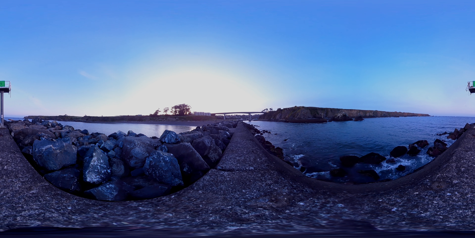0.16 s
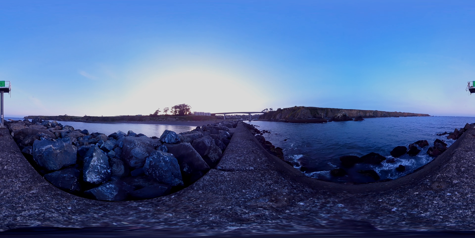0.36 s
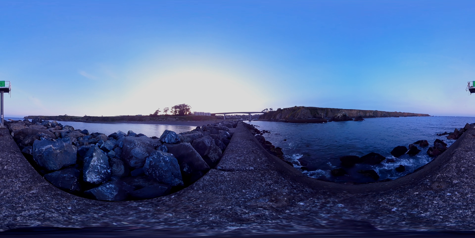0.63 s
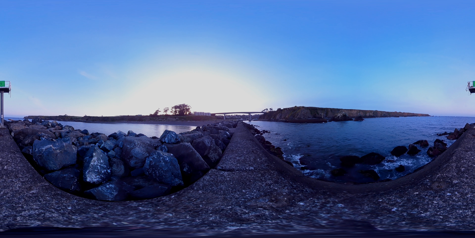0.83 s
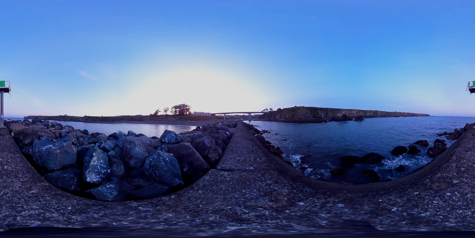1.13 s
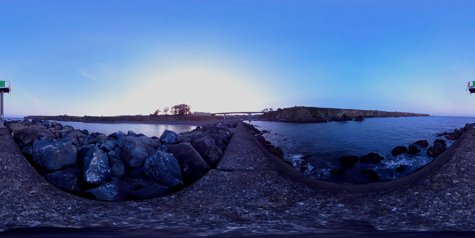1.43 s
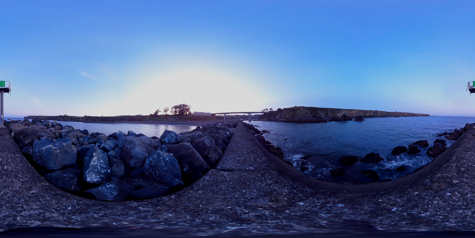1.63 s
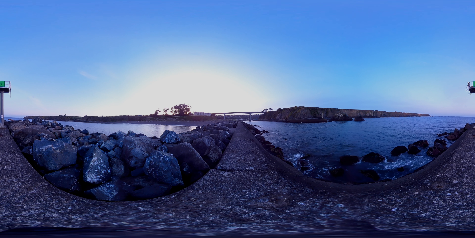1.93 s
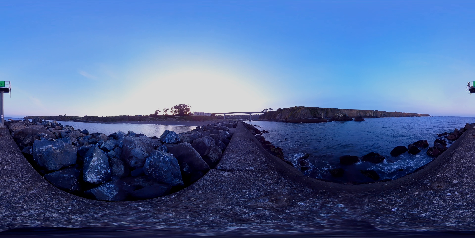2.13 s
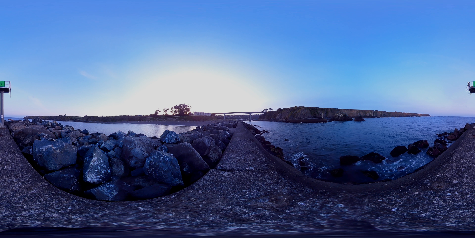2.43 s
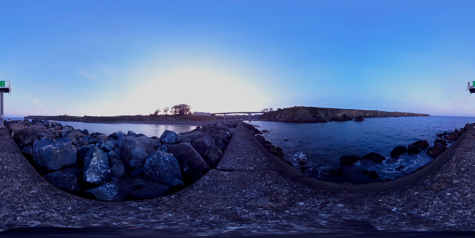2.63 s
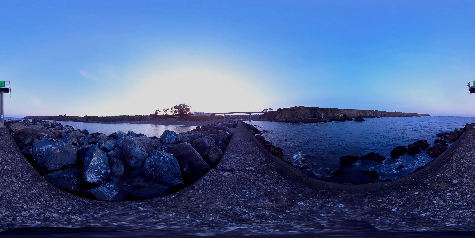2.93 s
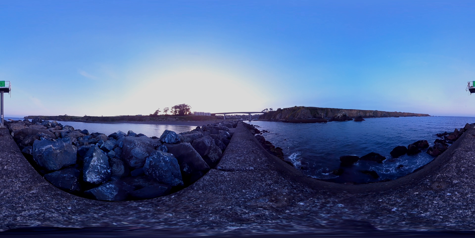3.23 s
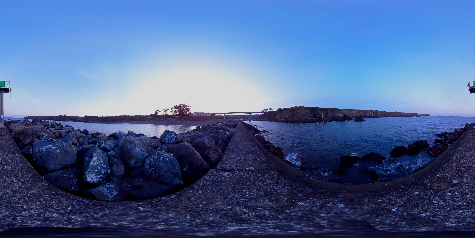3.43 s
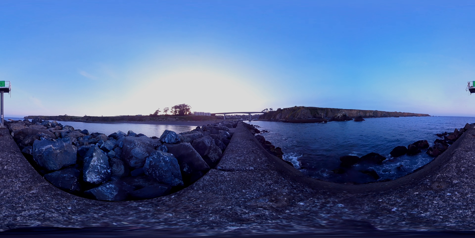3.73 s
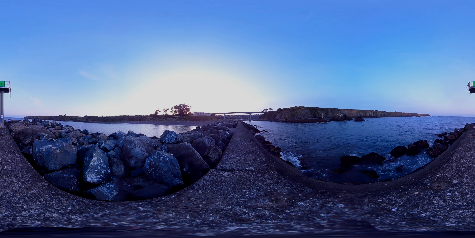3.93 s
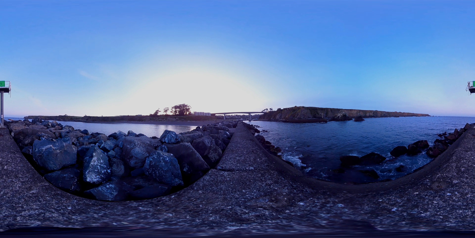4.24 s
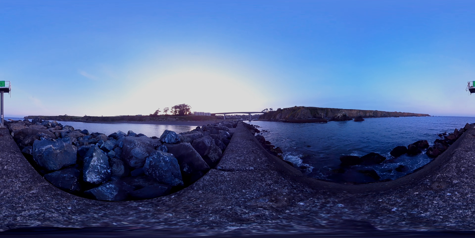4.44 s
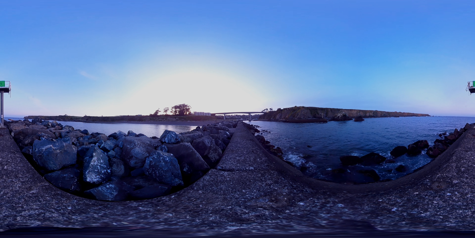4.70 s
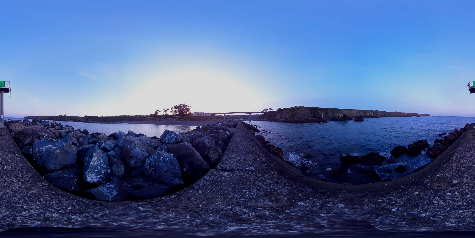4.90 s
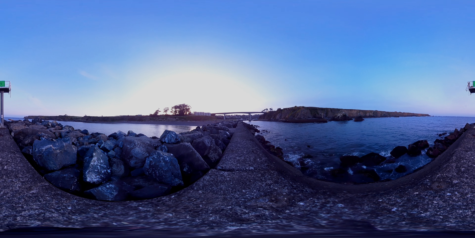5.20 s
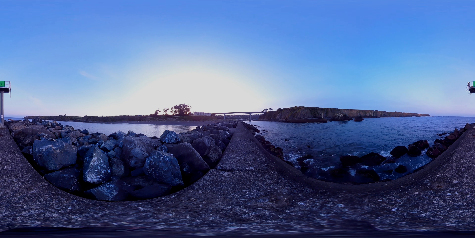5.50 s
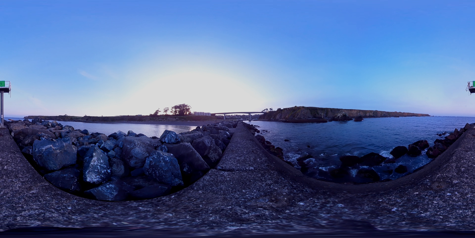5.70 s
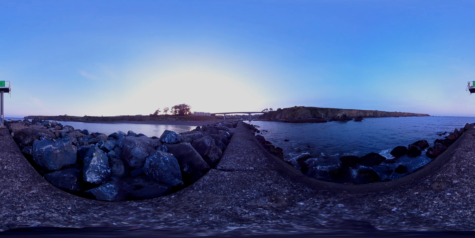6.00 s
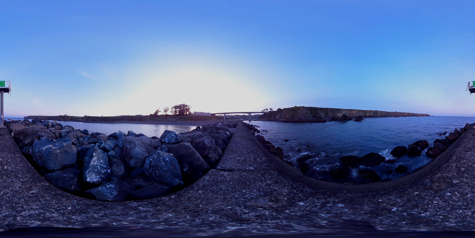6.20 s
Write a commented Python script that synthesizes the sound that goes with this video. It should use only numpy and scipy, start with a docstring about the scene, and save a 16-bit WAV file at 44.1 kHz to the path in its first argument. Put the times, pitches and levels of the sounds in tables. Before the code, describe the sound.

Heard from an open stone jetty: a broad, soft roar of sea, with hissing foam and little rising bubble notes as water fills gaps in the rocks. It opens with a wash, lulls while a distant horn barely shows, then breaks repeatedly. Low wind thuds hit the left and right of a small, slightly muffled stereo microphone separately, strongest in the last second.

```python
"""Small waves on a harbour jetty

Small waves wash over boulders: swelling bands of noise make a broad roar, with foam popping on top.
Short rings that rise in pitch are pockets of air glugging between the rocks.
Low noise and single push-pull pulses are wind on each port of a small two-port microphone.
A far horn, one sine wave, holds a low note for most of a second."""
import sys
import numpy as np
from scipy import signal
from scipy.fft import rfft, irfft, next_fast_len
from scipy.io import wavfile

SR = 44100
rng = np.random.default_rng(int(sys.argv[2]) if len(sys.argv) > 2 else 0)


def log_audio(samples):
    """Write samples as a 16-bit WAV file to the path given in sys.argv[1]."""
    # one column per channel
    frames = np.atleast_2d(samples).T
    # limit to full scale, then quantise
    limited = np.clip(frames, -1, 1)
    pcm = np.round(limited * 32767).astype(np.int16)
    wavfile.write(sys.argv[1], SR, pcm)


def rack_gain(trim_db):
    """Turn a fader trim in dB into the linear factor to multiply a signal by."""
    fader = np.asarray(trim_db, float)
    return 10 ** (fader / 20)


N = 280337   # samples, about 6.4 s


def rms_one(x):
    """Scale to unit rms."""
    return x / np.sqrt(np.mean(x ** 2) + 1e-20)


def at_hz(rows, hz):
    """Join the rows of a spectrum by straight lines on a log-frequency axis."""
    at, *columns = np.transpose(rows)
    return [np.interp(np.log(hz), np.log(at), column) for column in columns]


def drift(rate_hz):
    """Slow chance of spread 1: noise at every 40th sample, smoothed twice by a one-pole low-pass."""
    pole = np.exp(-2 * np.pi * rate_hz * 40 / SR)
    noise = rng.standard_normal(N // 40 + 2002)
    slow = signal.lfilter([1], [1, -2 * pole, pole ** 2], noise)[2000:]   # drop the filter's start-up
    return np.interp(np.arange(N) / 40, np.arange(len(slow)), rms_one(slow))


def cut(x, hz, kind, order):
    """Butterworth low- or high-pass."""
    return signal.sosfilt(signal.butter(order, hz, kind, fs=SR, output="sos"), x)


def seconds_outside(start_s, length_s):
    """How far each sample lies before or after a span of time; zero inside it."""
    t = np.arange(N) / SR
    return np.maximum(start_s - t, 0) + np.maximum(t - start_s - length_s, 0)


def horn():
    """A far steady note that swells a little; the air between makes it waver."""
    # one horn note: start_s, length_s, pitch_hz, level_db (rms at its middle, before the waver)
    horn_note = (1.4, 0.7, 157, -49)
    start_s, length_s, pitch_hz, level_db = horn_note
    swell_db_per_s, edge_db_per_s, waver_db = 4, 60, 1.3
    t = np.arange(N) / SR
    swell_db = swell_db_per_s * (t - start_s - length_s / 2)
    edge_db = -edge_db_per_s * seconds_outside(start_s, length_s)
    loudness = rack_gain(level_db + swell_db + edge_db + waver_db * drift(4))
    return np.sqrt(2) * loudness * np.sin(2 * np.pi * pitch_hz * t)


def gusts_db():
    """Each gust rises fast, holds and falls back to the calm, at its own strength on each port."""
    # gusts on the ports: middle_s, left_db, right_db (rms of the rumble), held_s
    gust_list = [(0.08, -46, -43.5, 0.027), (0.19, -55, -48, 0.048), (0.62, -61, -63, .2),
                 (0.89, -43, -37, 0.048), (1.2, -47, -39, 0.012), (1.359, -45, -40, 0.013),
                 (1.68, -62.5, -51.5, 0.021), (1.92, -61, -48, 0.05), (2.18, -65, -45.5, 0.066),
                 (2.45, -45, -42, .04), (2.57, -41, -55, 0.03), (2.72, -50, -43, .16),
                 (3.02, -40, -38.5, 0.074), (3.12, -45, -57, 0.027), (3.33, -43, -36.5, 0.033),
                 (3.435, -39.5, -35.5, 0.04), (3.5, -36.5, -42, 0.094), (3.6, -54, -40, 0.018),
                 (3.78, -41.5, -46, 0.051), (4.001, -47.5, -41, 0.077), (4.12, -47, -41.5, .06),
                 (4.28, -39, -37, 0.1), (4.521, -39, -40, 0.17), (4.68, -48, -42.5, 0.087),
                 (4.93, -47, -44, .08), (5.07, -41, -38, 0.13), (5.22, -43, -43, .1),
                 (5.47, -33.5, -33.5, 0.096), (5.7, -33.5, -33, 0.2), (5.95, -34, -33.5, 0.26),
                 (6.27, -32.5, -31.5, 0.29)]
    calm_db, rise_db_per_s, fall_db_per_s = -66, 164, 170
    middle_s, left_db, right_db, held_s = np.transpose(gust_list)[:, :, None]
    t = np.arange(0, N + 64, 64) / SR   # every 64 samples is fine enough
    rise_db = -rise_db_per_s * np.maximum(middle_s - held_s / 2 - t, 0)
    fall_db = -fall_db_per_s * np.maximum(t - middle_s - held_s / 2, 0)
    ports = []
    for db in (left_db, right_db):
        power = rack_gain(calm_db) ** 2 + np.sum(rack_gain(db + rise_db + fall_db) ** 2, axis=0)
        ports.append(np.interp(np.arange(N) / SR, t, 10 * np.log10(power)))
    return np.array(ports)


def wind():
    """Eddies push on each port alone; stronger gusts carry faster eddies and reach higher."""
    gust_db = gusts_db()
    noise = rng.standard_normal((3, 2, N))
    # three bands of eddies, slow to fast
    rumble = rms_one(cut(cut(noise[0], 114, "low", order=3), 31, "high", order=2))
    flutter = rms_one(cut(cut(noise[1], 195, "low", order=5), 103, "high", order=2))
    whip = rms_one(cut(cut(noise[2], 305, "low", order=3), 226, "high", order=2))
    # levels against the rumble; both grow with the gust
    flutter_db = -5 + 0.93 * (gust_db + 31)
    whip_db = -13 + 2.2 * (gust_db + 32)
    lumps = rack_gain(2.8 * np.array([drift(24), drift(9.4)]))   # uneven strength, left and right
    lumps /= np.sqrt(np.mean(lumps ** 2))
    return rack_gain(gust_db) * lumps * (rumble + rack_gain(flutter_db) * flutter + rack_gain(whip_db) * whip)


def buffets():
    """One large eddy rolls over a port: a push and a pull of about one cycle."""
    # single strong buffets: middle_s, peak_db, pitch_hz, port (0 left, 1 right)
    buffet_list = [(0.804, -33, 89, 0), (.865, -41, 71, 0), (0.887, -21, 91.7, 1), (.905, -34, 60, 0),
                   (2.8, -31, 92.5, 0), (2.822, -31, 53, 1), (2.944, -28.5, 80, 0), (3.136, -31, 64, 0),
                   (3.437, -27, 110, 1), (3.589, -28, 69, 1), (4.138, -32, 87, 1), (4.246, -28, 131, 0),
                   (4.389, -31, 70, 0), (4.447, -29.5, 65, 1), (4.933, -26, 113, 0), (5.044, -26.5, 98, 1),
                   (5.248, -28, 76, 1), (5.484, -17.5, 59, 1), (5.596, -23, 91, 1), (5.874, -21, 135, 0),
                   (5.896, -21.5, 104, 1), (6.215, -21, 112, 0), (6.249, -25, 76, 1), (6.331, -22, 64.5, 0),
                   (6.347, -32.5, 135, 1)]
    width_cycles = 0.68   # from the middle until the pulse has shrunk to about a third
    out = np.zeros((2, N))
    for middle_s, peak_db, pitch_hz, port in buffet_list:
        turns = (np.arange(N) / SR - middle_s) * pitch_hz
        near = np.abs(turns) < 2
        turns = turns[near]
        shape = np.exp(-(turns / width_cycles) ** 2)
        out[int(port > 0.5), near] += rack_gain(peak_db) * shape * np.cos(2 * np.pi * turns + 0.29)
    return out


def glugs():
    """A closing pocket rings a few cycles and rises in pitch as it shrinks; many small ones come at random."""
    # air pockets closing between the rocks: start_s, peak_db, pitch_hz (at the start), ring_cycles
    pocket_list = [(0.042, -32, 1740, 7.9), (0.229, -31, 1000, 6), (0.24, -39, 1440, 7),
                   (0.293, -34, 745, 6.9), (0.394, -38, 540, 5), (0.411, -37, 1750, 7),
                   (1.835, -35, 1180, 6), (2.223, -38, 1610, 8), (2.64, -35, 1180, 6),
                   (2.849, -38, 2120, 8), (3.182, -36, 1430, 8), (3.249, -35, 2140, 8.3),
                   (3.897, -34, 1940, 8.7), (4.037, -36, 397, 5), (4.186, -32, 585, 5.5),
                   (4.495, -39, 2850, 9), (4.611, -36.5, 1580, 6.5), (4.662, -30, 720, 7),
                   (4.899, -35, 1530, 12), (4.907, -36, 930, 8), (4.9455, -33.5, 2530, 12),
                   (4.969, -39, 1300, 8), (5.102, -43, 3300, 13), (5.201, -51, 3320, 10),
                   (5.505, -36.5, 2600, 9), (5.54, -40, 1590, 7.6), (5.711, -33, 490, 5.6),
                   (6.294, -32, 1061, 7.4), (2.015, -30, 390, 3.3), (2.188, -34.5, 226, 13),
                   (2.21, -37, 245, 70), (2.239, -34.5, 340, 5.7), (2.385, -28.5, 273, 2.9),
                   (2.662, -35.5, 250, 7.6), (3.256, -30.5, 193, 5.4), (3.3782, -22.5, 410, 1.9),
                   (3.397, -33, 1070, 5), (3.422, -29, 726, 3.6), (3.509, -27.5, 380, 2),
                   (3.525, -35, 710, 5.6), (3.588, -32, 480, 2.3), (3.727, -34, 473, 5.3),
                   (3.826, -38, 493, 5.4), (4.845, -32, 305, 1.3), (5.09, -32, 350, 6.4),
                   (5.375, -30, 376, 3.7)]
    rise, small_per_s, small_cycles = 0.14, 25, 2.9
    draws = rng.random((int(small_per_s * N / SR), 3))
    small_start_s = draws[:, 0] * N / SR
    small_peak_db = -46 - 4 * np.log(draws[:, 1] + 0.05)   # most are quiet, a few louder
    small_pitch_hz = 220 * 4 ** draws[:, 2]
    small = np.c_[small_start_s, small_peak_db, small_pitch_hz, np.full(len(draws), small_cycles)]
    out = np.zeros(N + SR)   # a spare second for the last tails
    for start_s, peak_db, pitch_hz, cycles in np.vstack([pocket_list, small]):
        turns = np.arange(int(3 * cycles / pitch_hz * SR)) * pitch_hz / SR
        shape = (1 - np.exp(-3 * turns)) ** 2 * np.exp(-3 * turns / cycles)
        ring = np.sin(2 * np.pi * (turns + rise * turns ** 2 / cycles))
        at = int(start_s * SR)
        out[at:at + len(turns)] -= rack_gain(peak_db) * shape / shape.max() * ring
    return out[:N]


def foam_pops(per_s, spread_db):
    """Tiny bubbles burst at random, most small and a few large, in clumps."""
    sizes = rack_gain(spread_db * np.minimum(rng.exponential(1, N), 5)) * rng.choice([-1, 1], N)
    born = rng.random(N) < per_s * rack_gain(3 * drift(15)) / SR   # the drift makes the clumps
    return rms_one(cut(sizes * born, 4300, "high", order=2))


def treble_turn():
    """Radians of phase turn between the ports in the top treble, before sway and a weight by pitch."""
    # spans in which the phase of the top treble turns: start_s, length_s, turn_rad (added to the rest)
    turn_list = [(0.0, 0.041, 1.4), (0.155, 0.075, 1.6), (0.364, 0.16, 0.91), (0.639, 0.036, 1.3),
                 (0.73, 0.19, 1.4), (1.145, 0.38, 0.78), (1.888, 0.25, 0.72), (2.834, 0.019, 0.97),
                 (2.975, 0.32, 1.4), (3.39, 0.034, 1.4), (3.662, 0.19, 2.04), (4.03, 0.32, 1.6),
                 (4.422, 0.25, 1.7), (5.36, 0.07, 0.35), (5.78, 0.13, 0.29), (6.17, 0.027, 0.17)]
    edge_s, rest_rad = 0.021, 0.11   # how fast the turn comes and goes; the turn between spans
    return rest_rad + sum(turn_rad * np.exp(-(seconds_outside(start_s, length_s) / edge_s) ** 2)
                          for start_s, length_s, turn_rad in turn_list)


def sea_level_db(hz):
    """The far sea, and the dB that breakers add: each builds, crests and dies, loudest around its own middle."""
    # pitches at which the far sea's level is given: pitch_hz
    sea_pitches = [420, 1000, 2300, 6500]
    # the unbroken far sea at those pitches (swell roar, breaking, wash, foam): level_db
    far_levels = [-45.5, -45, -50.5, -52]
    # water breaking on the rocks: crest_s, level_db (against the far sea),
    # middle (octaves above 250 Hz), spread (octaves), dying_s
    breaker_list = [(0.0, 5.5, 0.7, 2.2, 0.056), (0, 6, 4.5, 0.61, 0.45), (0.34, 4, 1.8, 1.36, 0.28),
                    (0.03, 6, 2.8, 0.6, 0.4), (0.45, -2, 0, 0.62, 0.36), (0.85, -12, 6.3, 1.6, 0.2),
                    (0.02, 7.5, 5.5, 0.69, 0.43), (1.95, -2, 1.4, 1.4, 0.23), (2.5, 0.5, 1, 0.96, 0.21),
                    (2.3, -0.5, 4.5, 1.0, .5), (2.7, -3, 1.4, 1.5, 0.087), (2.82, 2, 4.6, 0.83, 0.37),
                    (3.1, 5, 5, 1.85, 0.59), (3, 1.5, 0.9, 0.8, 0.06), (3.5, 4.5, 0.9, 1.1, 0.22),
                    (3.5, 2.5, 0.7, 0.7, 0.07), (3.42, 5.5, 5.1, 2, 0.46), (3.5, 8, 6.4, 1.7, 0.18),
                    (4, -1.5, 0.83, 1.2, 0.38), (4.2, 4, 6, 2.6, 0.54), (4.5, 6.5, 6.5, 2.2, 0.41),
                    (4.7, -3, 0, 1.3, 0.091), (4, -2, 3, 0.41, .3), (5, 1, 0, 0.44, 0.18),
                    (5, -4, 2.2, 1.1, 0.2), (4.92, 5, 3.5, 0.75, 0.38), (5.0, 2, 5, 0.84, 0.61),
                    (4.5, 1, 5, 1.1, 0.47), (5.15, 2, 3, 1.6, 0.18), (5, 5.5, 0.4, 0.49, 0.19),
                    (5.5, 6, 3.44, 0.39, 0.46), (5.45, 6.5, 5, 0.8, 0.7), (5.5, -2.5, 0.77, 1.4, 0.65),
                    (5.7, 0.5, 4, 1.3, 0.18), (6, 0.5, 5, 1.5, 0.32), (6.15, 4.5, 4.5, 0.69, 0.43),
                    (6.25, 0, 0.5, 0.59, 0.26)]
    build_s = 0.094   # a breaker grows for about this long before its crest
    crest_s, db, middle, spread, dying_s = np.transpose(breaker_list)[:, :, None]
    t = np.arange(0, N + 64, 64) / SR
    building = ((crest_s - t) / build_s) ** 2
    dying = (t - crest_s) / np.maximum(dying_s, 0.03)
    shape = np.exp(-np.where(t < crest_s, building, dying))
    reach = np.exp(-((np.log2(hz / 250) - middle) / np.maximum(spread, 0.3)) ** 2)
    over_db = 10 * np.log10(1 + np.sum(rack_gain(db) ** 2 * reach * shape, axis=0))
    far_db = np.interp(np.log(hz), np.log(sea_pitches), far_levels)
    return far_db, np.interp(np.arange(N) / SR, t, over_db)


def sea():
    """Overlapping bands of noise, each swelling with its part of the wave and flickering on its own."""
    # the sea's colour through the housing, with its dip and port resonance:
    # pitch_hz, density_db (per Hz, against the sea level)
    sea_colour = [(30, -27), (55, -27), (80, -28), (115, -24.5), (150, -22), (300, -24.5), (500, -26.6),
                  (900, -28.2), (1500, -30.3), (2600, -33.7), (3600, -40), (4500, -50), (5000, -41),
                  (5600, -32), (6500, -37.5), (8000, -41), (9800, -41), (10500, -46), (11300, -54),
                  (11800, -66)]
    # how the two ports hear the near rocks: pitch_hz, likeness (0 to 1), left_lag_rad
    port_pair = [(60, .97, .03), (147, .995, .06), (280, .997, .1), (470, .99, .17), (680, .95, .25),
                 (900, 0.84, 0.34), (1460, 0.71, 0.85), (2520, 0.7, 1.26), (3170, .62, 1.77),
                 (3500, 0.6, 2), (3850, 0.7, 2.3), (4330, 1, 3.5), (4450, 0.96, 4), (4780, 0.93, 3),
                 (5050, 0.68, 3), (5350, 0.52, 3.2), (5760, 0.54, 3.5), (6075, 0.98, 3), (8640, 0.94, 3),
                 (10000, 0.93, 3.5), (10500, 0.94, 3)]
    together_db, patchy_db = 0.35, 1.23   # flicker shared by all bands, and of each band alone
    pops_db, sway, dim_db_per_rad = -5, 0.82, 8
    low_lag, high_lag, rest_db, lift_db_per_rad = 0.2, 0.04, -1, 1.5

    size = next_fast_len(N)
    hz = np.maximum(np.arange(size // 2 + 1) * SR / size, 1)
    colour = rack_gain(at_hz(sea_colour, hz)[0]) * np.sqrt(SR / 2)
    alike, lag = at_hz(port_pair, hz)
    alike = np.clip(alike, 0, 1)
    # the near rocks reach both ports, the left one later; the rest arrives from all around
    near = rng.standard_normal(N) + rack_gain(pops_db) * foam_pops(per_s=2500, spread_db=4)
    near = rfft(near, size) * colour * np.sqrt(alike) * np.exp(-0.5j * lag * [[1], [-1]])
    around = rfft(rng.standard_normal((2, N)), size) * colour * np.sqrt(1 - alike)

    steady_turn = treble_turn()
    turn = np.maximum(steady_turn * (1 + sway * drift(32)), 0)
    centres_hz = np.r_[np.geomspace(60, 7000, num=14), 9200, 10000, 11000]
    out, together = np.zeros((2, N)), drift(6.4)
    for k, centre_hz in enumerate(centres_hz):
        # each band fades into its neighbours
        band = np.interp(np.log(hz), np.log(centres_hz), np.arange(len(centres_hz)) == k)
        far_db, over_db = sea_level_db(centre_hz)
        level_db = far_db + over_db + together_db * together + patchy_db * drift(23)
        if centre_hz > 10500:   # the very top dims while its phase is turned
            level_db -= dim_db_per_rad * turn

        heard = irfft(near * band, size)[:, :N]
        half_turn = turn / 2 * np.interp(centre_hz, [9060, 10000, 11000], [0, 0.9, 1.5])
        if np.any(half_turn):   # turn the two ports' phases in opposite directions
            quarter_later = irfft(-1j * near * band, size)[:, :N]
            heard = np.cos(half_turn) * heard + np.sin(half_turn) * quarter_later * [[1], [-1]]

        # the surrounding water swells less than the near rocks;
        # above 2.5 kHz its level also rises with the turn of the top treble
        if centre_hz < 2500:
            around_db = -low_lag * (over_db + 0.5)
        else:
            around_db = rest_db - high_lag * over_db + lift_db_per_rad * steady_turn
        surrounding = irfft(around * band, size)[:, :N]
        out += rack_gain(level_db) * (heard + rack_gain(around_db) * surrounding)
    return out


def scene():
    """Horn, wind and water at the two ports."""
    return horn() + wind() + buffets() + glugs() + sea()


def top_cut(x):
    """Nothing passes above the cut-off."""
    return signal.sosfilt(signal.butter(12, 11800, fs=SR, output="sos"), x)


def record(dry):
    """Turn the finished mix into the sound that is written out."""
    return top_cut(dry)


dry = scene()
out = record(dry)
log_audio(out)
```